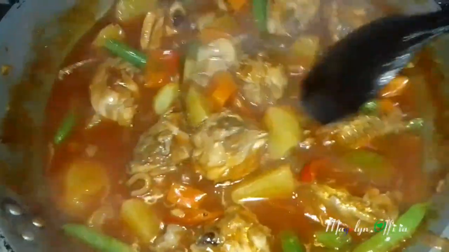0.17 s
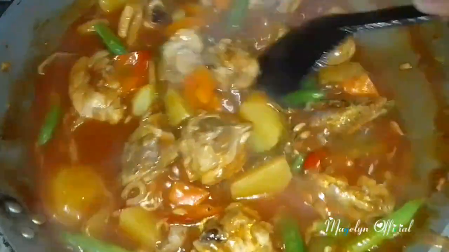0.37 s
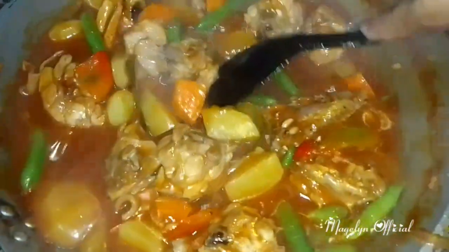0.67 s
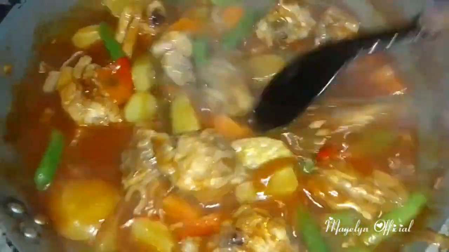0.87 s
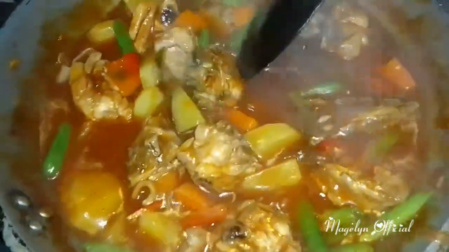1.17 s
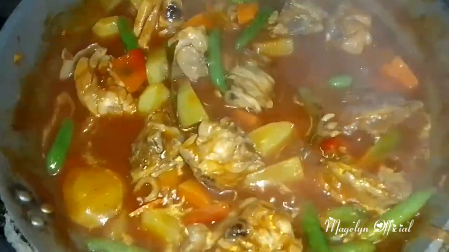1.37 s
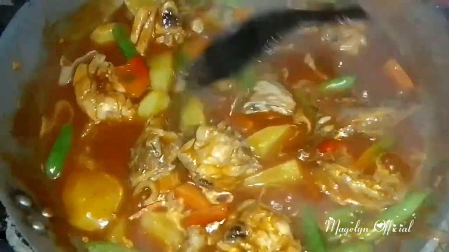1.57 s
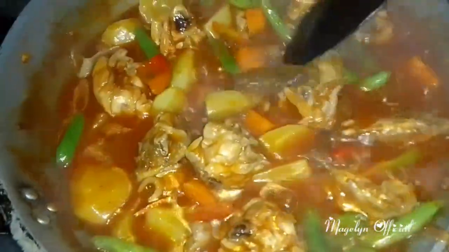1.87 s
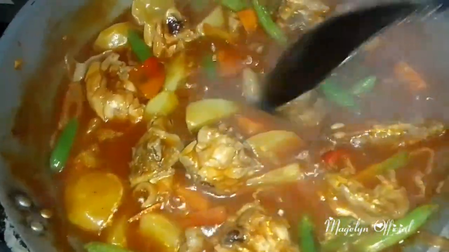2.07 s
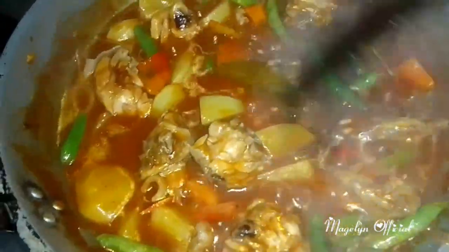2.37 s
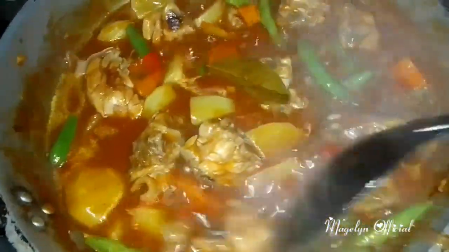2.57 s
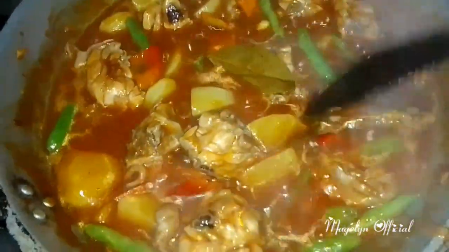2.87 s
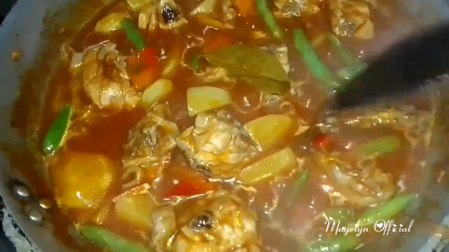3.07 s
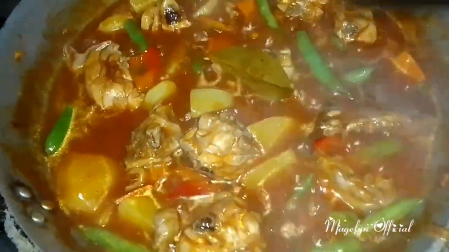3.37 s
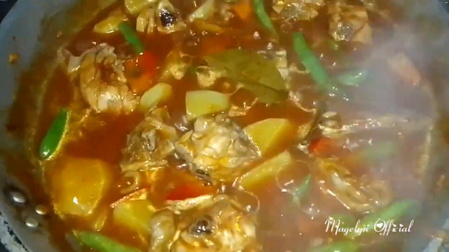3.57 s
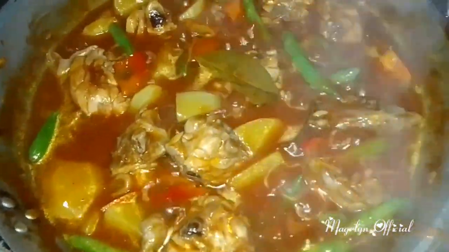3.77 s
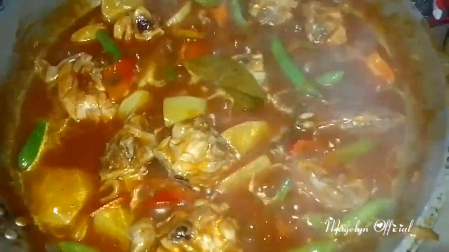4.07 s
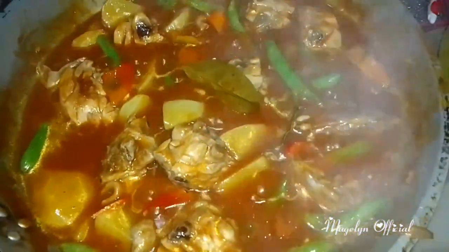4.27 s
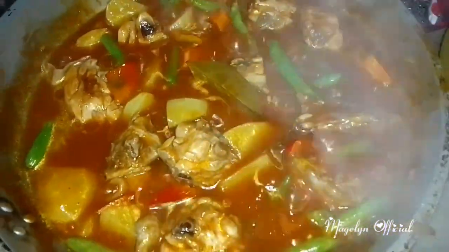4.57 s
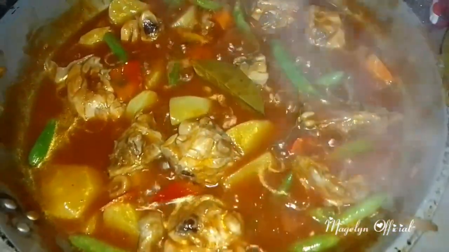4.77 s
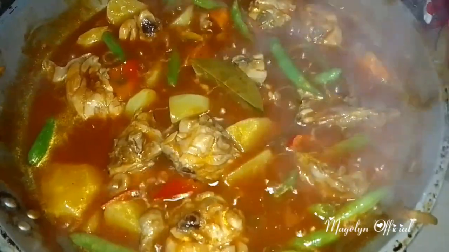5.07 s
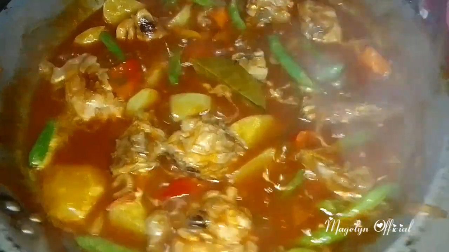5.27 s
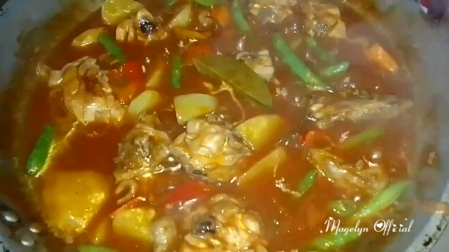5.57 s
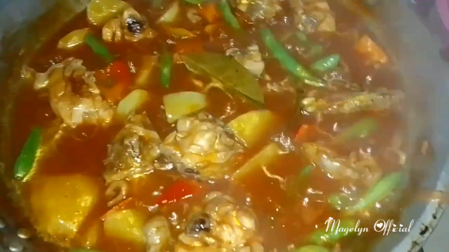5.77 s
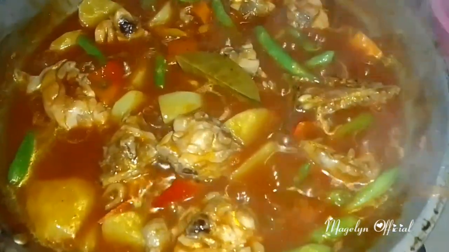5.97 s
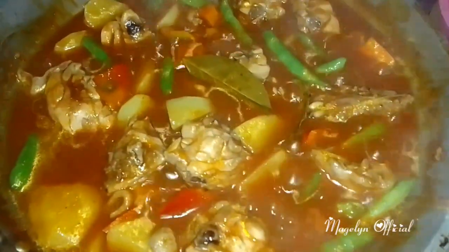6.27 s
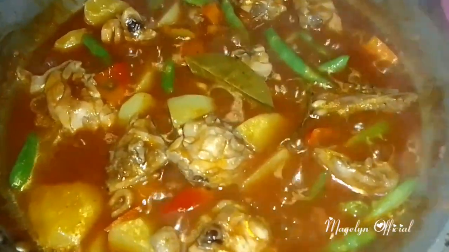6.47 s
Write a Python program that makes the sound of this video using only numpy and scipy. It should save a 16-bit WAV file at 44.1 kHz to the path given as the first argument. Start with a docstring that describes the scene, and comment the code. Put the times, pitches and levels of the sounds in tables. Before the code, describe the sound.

Close to a pan of thick stew in a small kitchen, bubbles blip, glug and plop over constant fine crackling. A plastic spoon bumps and scrapes busily in the first second, with one bright wet squelch, then returns for brief rasps and squeaks. A cluster of dull knocks comes around four and a half seconds, after which the boil grows fuller. A low wavering hum and soft room noise lie underneath.

```python
"""A thick stew simmers in a metal pan: bubbles plop and glug, and tiny ones crackle all the time.
Each bubble is a short ringing tone; films of sauce that burst add ticks and puffs of noise.
A plastic spoon pushes the pieces about, scraping, squeaking and bumping: random slips and knocks
ring the resonances of the pan and spoon. Behind it lie the low hum and steady noise of a kitchen,
made of filtered noise, and the short echo of a small room."""
import sys
import numpy as np
from scipy import signal
from scipy.fft import rfft, irfft
from scipy.io import wavfile

SR = 44100
rng = np.random.default_rng(int(sys.argv[2]) if len(sys.argv) > 2 else 0)


def wav_out(sig):
    """Save sig, one row per channel (or a flat mono array), as 16-bit PCM at SR to the path in sys.argv[1]."""
    wavfile.write(sys.argv[1], SR, np.round(np.clip(np.atleast_2d(sig).T, -1, 1) * 32767).astype(np.int16))


N = 292383

# how hard the stew boils: (time [s], level [dB])
BOIL_LEVEL = [(0, 6), (1.4, 3), (2.6, 5.5), (3.6, 6.5), (4.9, 6), (5.7, 8), (6.201, 7.5), (6.63, 8.5)]
# low resonances of the pan, damped by the stew: (pitch [Hz], width [Hz], level [dB])
PAN_MODES = [(173.4, 5.8, -4), (211, 39, -12), (265.7, 113, -4), (371.7, 85, -1.5), (441, 80, -3),
             (503.6, 67, 1), (615.6, 24, -3), (717, 68, -2.5), (775, 25, -10)]


def simmer():
    """Small bubbles blip, gurgle, splutter and pip in the sauce; the tiniest crackle, tick and spit at its edge."""
    # the crackle of tiny bubbles: (bursts per second [1/s], spread of strength [dB])
    crackle_bursts = (1100, 6.5)
    # colour of the crackle: (frequency [Hz], level [dB per Hz])
    crackle_colour = [(1800, 3.5), (3000, 4.5), (5000, 2.5), (8000, 0), (9300, -22), (15000, -42)]
    crackle_per_s, crackle_spread_db = crackle_bursts

    gurgle = swarm(388, 740, per_s=110, cycles=5.1, spread_db=6.5, rise=0.46, onset_cycles=0.59, count=12)
    blips = swarm(1143, 1500, per_s=99, cycles=6.6, spread_db=0.5, rise=0.072, onset_cycles=6.5, count=10)
    splutter = swarm(737, 1680, per_s=120, cycles=3.2, spread_db=2, rise=0.019, onset_cycles=0.39, count=14)
    pips = swarm(1690, 3520, per_s=70, cycles=17, spread_db=14.5, rise=0.074, onset_cycles=0.34, count=12)
    tiny = swarm(1750, 13500, crackle_per_s, cycles=4.2, spread_db=crackle_spread_db,
                 rise=0.017, onset_cycles=0.61)
    crackle = colour(tiny, crackle_colour)
    ticks = swarm(6970, 8760, per_s=66, cycles=36, spread_db=5, rise=0.024, onset_cycles=0.32, count=8)
    spray = spits(per_s=53, spread_db=3.5, fade_s=0.0057)

    bubbles = amp(-71.5) * gurgle + amp(-75.5) * blips + amp(-78.5) * splutter + amp(-86.5) * pips
    edge = amp(-85.0) * crackle + amp(-93.0) * ticks + amp(-87.0) * spray
    return amp(curve_db(BOIL_LEVEL)) * (bubbles + edge)


def spits(per_s, spread_db, fade_s):
    """Bursting films throw a fine spray: brief puffs of broad, gritty noise."""
    # colour of the spray: (frequency [Hz], level [dB per Hz])
    spray_colour = [(700, 16), (1500, 0), (3000, 8), (5000, 17), (8200, 3.5), (9500, -19), (15000, -36)]
    bursts = abs(clicks(N, per_s, spread_db))
    # every burst jumps up at once and then dies away
    puffs = signal.lfilter([1], [1, -np.exp(-1 / (fade_s * SR))], bursts)
    grit = clicks(N, per_s=3200, spread_db=-1.0)
    return colour(puffs * grit, spray_colour)


def glugs():
    """Deep bubbles heave under the pieces, far more as the boil grows."""
    boil = amp(1.33 * curve_db(BOIL_LEVEL))
    deep = swarm(144.3, 550, per_s=90, cycles=11.6, spread_db=4, rise=0.059, onset_cycles=0.67, count=10)
    return amp(-73.0) * boil * deep


def plops():
    """Each large bubble rings once, and its skin falls back in a short splutter."""
    # large bubbles burst: (time [s], peak level [dB], pitch [Hz], ring time [s])
    large_bubbles = [(0.074, -44.5, 1290, 0.058), (0.1186, -45.5, 1290, 0.032), (0.471, -37, 1290, 0.013),
                     (0.526, -35.5, 1450, 0.016), (0.553, -41, 1350, 0.016), (0.5995, -42, 1300, 0.023),
                     (0.644, -41.5, 1330, 0.028), (0.668, -53, 1380, 0.016), (0.7217, -38, 1375, 0.02),
                     (0.754, -51, 1370, 0.01), (0.766, -46, 1370, 0.025), (0.79, -46.5, 1370, 0.057),
                     (0.9972, -46, 1350, 0.0332), (1.3238, -49, 1290, 0.014), (1.3788, -50, 1302, 0.029),
                     (1.632, -41.5, 1430, 0.0057), (1.827, -38.5, 1187, 0.0092), (1.875, -46, 1190, 0.013),
                     (1.8955, -39.5, 1310, 0.013), (1.9776, -46, 1500, 0.0198), (2.37, -46.5, 1010, 0.011),
                     (2.432, -51.5, 1353, 0.022), (2.491, -53, 1450, 0.0089), (2.506, -50.5, 1390, 0.032),
                     (2.661, -43, 1223, 0.015), (2.936, -43.5, 1130, 0.015), (3.0788, -42.5, 1180, 0.018),
                     (3.7248, -41, 1270, 0.045), (3.745, -44.5, 1370, 0.029), (3.918, -43.5, 1420, 0.011),
                     (3.962, -50, 1800, 0.04), (4.191, -42.5, 1300, 0.013), (4.2085, -43, 1129, 0.025),
                     (4.321, -49, 1400, 0.057), (4.4957, -46.5, 1495, 0.029), (4.7416, -46, 1394, 0.025),
                     (4.883, -49, 1390, 0.0082), (4.939, -41.5, 537, 0.04), (4.973, -60, 1390, 0.015),
                     (5.026, -46.5, 1200, 0.016), (5.114, -54, 545, 0.019), (5.236, -48.5, 1445, 0.047),
                     (5.254, -45, 480, 0.04), (5.299, -44.5, 1850, 0.011), (5.424, -51, 1420, 0.015),
                     (5.494, -45.5, 463, 0.031), (5.59, -46.5, 1160, 0.0088), (5.675, -45.5, 1280, 0.0103),
                     (5.7752, -43.5, 1254, 0.053), (5.877, -49.5, 1090, 0.0164),
                     (6.025, -47.5, 1350, 0.015), (6.109, -45, 540, 0.028), (6.12, -41.5, 1332, 0.023),
                     (6.253, -45.5, 1400, 0.0095), (6.379, -50, 1903, 0.016), (6.573, -45, 1315, 0.041),
                     (6.6124, -37.5, 1070, 0.0045)]
    out = np.zeros(N)
    t = np.arange(SR // 10) / SR
    for start_s, db, hz, t60 in large_bubbles:
        add(out, start_s, amp(db) * bubble(hz, t60, rise=0.05, onset_cycles=2.5))
        # the splutter starts as the dome lifts, just before it bursts
        splutter = evened(band(clicks(len(t), 1000, 0.42), 924, 1440, order=2))
        envelope = np.exp(-t / 0.028) * (1 - np.exp(-t / 0.0073))
        add(out, start_s - .004, amp(db - 12.5) * splutter * envelope)
    return out


def squelch():
    """An air pocket squeezed out from under the spoon makes one bright blip that swells and dies."""
    # the blip: (peak level [dB], pitch [Hz], swell time [s], fade time [s])
    air_pocket = (-21, 1370, .003, .003)
    escape_s = .6276
    db, hz, swell_s, fade_s = air_pocket
    t = np.arange(N) / SR - escape_s
    envelope = np.exp(np.minimum(t / swell_s, -t / fade_s))
    return amp(db) * np.sin(2 * np.pi * hz * t) * envelope


def snaps():
    """A film of sauce snaps: a tick, a bright spit and a brief high ring."""
    # sharp wet snaps: (time [s], level [dB], pitch [Hz], brightness [dB])
    wet_snaps = [(0.559, -45.5, 6020, -57), (0.643, -36, 4490, -65), (0.795, -47.5, 3210, -68.5),
                 (0.8315, -48, 3113, -78), (0.889, -50.5, 3120, -88), (0.973, -51, 4827, -71),
                 (1.061, -51, 2730, -86), (1.1068, -51.5, 2850, -72), (1.567, -46, 3330, -71),
                 (1.925, -46, 4720, -88.5), (2.0393, -49.5, 6400, -71), (2.749, -50, 3770, -68.5),
                 (2.9056, -57, 2780, -63), (3.1794, -45.5, 2980, -67.5), (4.358, -47.5, 4400, -58),
                 (4.6628, -49, 4414, -72), (6.441, -58, 7560, -63)]
    out = np.zeros(N)
    t = np.arange(SR // 50) / SR
    for start_s, db, hz, bright_db in wet_snaps:
        noise = rng.standard_normal(len(t))
        tick = evened(band(noise, 2500, 6200, order=2)) * np.exp(-t / 0.0018)
        spit = evened(band(noise, 7900, SR / 2 - 1, order=2)) * np.exp(-t / 0.0009)
        high_ring = bubble(hz, 0.0158, rise=0.016, onset_cycles=1.1)
        add(out, start_s, amp(db - 19.5) * tick)
        add(out, start_s, amp(bright_db) * spit)
        add(out, start_s, amp(db - 5.5) * high_ring)
    return out


def shoves():
    """Shifted pieces jolt against the pan and the spoon judders over its floor; both stir the low modes."""
    # the spoon shoves pieces across the pan floor: (start [s], rise [s], hold [s], fade [s],
    # thump of the pieces [dB], push on the pan [dB], centre of the push [Hz])
    pushes = [(0.091, 0.006, 0.0067, 0.22, -49.5, -49, 470), (0.39, 0.026, 0.016, 0.08, -47.5, -42.5, 490),
              (0.472, 0.034, 0.44, 0.15, -55, -52, 650), (0.991, 0.13, 0.037, 0.2, -53, -51.5, 336),
              (1.579, 0.059, 0.0237, 0.33, -55.5, -62, 600), (1.857, 0.039, 0.0091, 0.144, -55, -63, 594),
              (1.937, 0.019, 0.065, 0.35, -57, -54, 684), (2.899, 0.064, 0.33, 0.12, -54, -54.5, 370),
              (3.978, 0.0099, 0.34, 0.23, -62, -83, 455), (4.189, 0.35, 0.061, 0.56, -54.5, -49, 564),
              (5.034, 0.04, 0.4, 0.35, -58, -55.5, 435)]
    push_q = 2.47  # sharpness of the push's colour
    out = np.zeros(N)
    for start_s, rise_s, hold_s, fade_s, thump_db, push_db, push_hz in pushes:
        move = effort(rise_s, hold_s, fade_s)
        jolts = clicks(len(move), per_s=600, spread_db=4.0)
        slips = clicks(len(move), per_s=550, spread_db=3.5)
        thump = band(ring(jolts, PAN_MODES, direct_db=-14.0), 134.0, 323.5)
        push = band(ring(focus(slips, push_hz, push_q), PAN_MODES, direct_db=-6.5), 252, 648)
        add(out, start_s, amp(thump_db) * played(thump, move))
        add(out, start_s, amp(push_db) * played(push, move))
    return out


def squishes():
    """The spoon ploughs through the sauce, which tears in a quick run of short wet clicks."""
    # runs of tearing sauce: (start [s], length [s], level [dB rms], lowest bubble [Hz], highest bubble [Hz])
    tearing_runs = [(.395, 0.078, -47.5, 724, 1960), (.475, .1, -56.5, 1230, 1850),
                    (0.597, 0.057, -50.5, 830, 2040), (0.742, 0.074, -62.5, 1206, 2250),
                    (1.885, 0.026, -54, 1030, 1650), (2.362, 0.078, -65.5, 880, 1960),
                    (2.73, .05, -59.5, 1580, 2900), (4.561, 0.0406, -52.5, 1380, 3120),
                    (5.081, 0.053, -57, 1070, 2500)]
    out = np.zeros(N)
    for start_s, length_s, db, lo_hz, hi_hz in tearing_runs:
        n = int(length_s * SR)
        tears = swarm(lo_hz, hi_hz, per_s=420, cycles=5, spread_db=2.0, rise=.1, onset_cycles=.5,
                      count=8, size=n)
        add(out, start_s, amp(db) * tears * signal.windows.tukey(n, .1))
    return out


def scrapes():
    """The spoon sticks and slips on the metal and slows in the sauce; slips rasp, fine grit scratches and hisses."""
    # the spoon lands and slides; each contact has its own low and high colour: (start [s], rise [s],
    # fade [s], rasp [dB], scratch [dB], fine hiss [dB], rasp centre [Hz], scratch centre [Hz])
    slides = [(0.0, 0.0017, 0.25, -71.5, -78.5, -76, 3280, 5270),
              (0.392, 0.0025, 0.18, -54, -71, -101, 1690, 5000),
              (0.434, 0.033, 0.4, -50.5, -72.5, -88.5, 1560, 5650),
              (.57, 0.13, 0.23, -60, -64.5, -73, 2000, 5160), (.78, 0.082, 0.19, -72, -71, -85, 2380, 4900),
              (1.103, 0.0061, 0.031, -54.5, -65.5, -85, 2700, 5870),
              (1.561, 0.0045, 0.059, -52.5, -71, -85, 2660, 3660),
              (1.883, 0.027, 0.22, -68, -69.5, -89, 1540, 6700),
              (2.023, 0.014, 0.071, -55, -64.5, -76.5, 1670, 6240),
              (2.728, 0.013, 0.099, -60.5, -67, -83, 2200, 7200),
              (2.839, 0.0094, 0.023, -78.5, -64.5, -87, 2780, 7440),
              (2.897, 0.011, 0.016, -57.5, -60, -84, 2740, 7540),
              (3.0, 0.28, 0.32, -77, -78, -88, 2780, 6600),
              (3.92, 0.021, 0.11, -56.5, -93, -86, 1780, 4400),
              (4.2, 0.048, 0.13, -56, -69, -92, 1420, 4060),
              (4.329, 0.019, 0.16, -62, -67, -73, 1880, 7900),
              (4.574, 0.0045, 0.068, -56, -83, -84, 2900, 3380),
              (5.064, 0.0031, 0.065, -63, -65, -105, 3570, 3670),
              (5.087, 0.0066, 0.092, -58.5, -76, -93, 1980, 4200),
              (5.3, 0.003, 0.059, -60, -68.5, -100, 1950, 4660)]
    # what the rubbed pan and spoon ring with: (pitch [Hz], width [Hz], level [dB])
    rubbed_modes = [(886, 120, 6), (1253, 94.5, 19.5), (1417, 184, 8), (1750, 100, 6), (2100, 200, -7),
                    (2340, 45, -9), (2440, 52, -8.5), (3025, 220, -3), (3370, 110, -5.5), (3840, 110, -6),
                    (4340, 120, -7.5), (4570, 100, -2.5), (4817, 84, -20), (5200, 180, -19),
                    (5604, 71, -18), (6130, 160, -5.5), (6400, 170, -13.5), (6840, 260, -15),
                    (7170, 73, -18.5), (7330, 210, -11.5), (7860, 160, -6), (8530, 190, -14),
                    (9310, 150, -15.5), (10500, 270, 1), (11150, 150, -2), (12000, 230, 5),
                    (12500, 180, -15), (12850, 240, 1), (13700, 270, 4), (13300, 190, 17), (15200, 190, 7),
                    (14800, 110, -6), (16200, 220, 5)]
    rasp_q, scratch_q = 7.2, 3.6  # sharpness of the two colours
    out = np.zeros(N)
    for start_s, rise_s, fade_s, rasp_db, scratch_db, hiss_db, low_hz, high_hz in slides:
        move = effort(rise_s, 0, fade_s)
        # the hand judders
        move = move * amp(drift(len(move), per_s=140, depth_db=3.5))
        slips = clicks(len(move), per_s=900, spread_db=5.0)
        grit = clicks(len(move), per_s=2400, spread_db=10.0)
        rasp = rub(focus(slips, low_hz, rasp_q), rubbed_modes, 760, 4600, direct_db=-21)
        scratch = rub(focus(grit, high_hz, scratch_q), rubbed_modes, 3300, 9200, direct_db=-15)
        hiss = rub(grit, rubbed_modes, 8800, 15000, direct_db=-5.5)
        for db, texture in (rasp_db, rasp), (scratch_db, scratch), (hiss_db, hiss):
            add(out, start_s, amp(db) * played(texture, move))
    return out


def rub(drive, modes, lo_hz, hi_hz, direct_db):
    """Rings the modes that lie in a band; each contact spot detunes them a little and favours some."""
    detune_share, favour_db = 0.0029, 5
    spot = rng.standard_normal((len(modes), 2))
    inside = []
    for (hz, width_hz, db), (pull, favour) in zip(modes, spot):
        if lo_hz < hz < hi_hz:
            inside.append((hz * (1 + detune_share * pull), width_hz, db + favour_db * favour))
    return band(ring(drive, inside, direct_db), lo_hz, hi_hz)


def squeaks():
    """Tiny slips keep a few resonances of the spoon singing in thin, finely fluttering lines."""
    # a gripping spoon sings; which resonances it holds depends on where it presses: (start [s],
    # length [s], glide [share of pitch], line width [Hz], lines as (pitch [Hz], level [dB]))
    songs = [(.43, .23, 0, 90, [(2330, -70), (2650, -72), (4370, -76), (4620, -76), (5980, -72),
             (7220, -80)]), (.6, .25, -.012, 80, [(1770, -67), (2260, -70), (2720, -75), (4260, -74),
             (4600, -74), (7230, -68), (8350, -78), (14640, -83)]), (.662, .11, 0, 70, [(3300, -66),
             (4900, -77), (5950, -79)]), (.76, .29, -.02, 80, [(1800, -72), (2700, -79), (3280, -76),
             (4330, -77), (4600, -73), (4930, -80), (5280, -83), (6880, -80)]),
             (.86, .42, 0, 40, [(4540, -88), (6000, -82)]), (1.36, .22, .17, 45, [(2070, -79), (2450, -82),
             (2840, -82), (3270, -87)]), (1.57, .27, -.025, 120, [(1800, -76), (2500, -77), (2830, -75),
             (3230, -76), (4660, -79), (6030, -84)]), (1.876, .37, -.005, 50, [(4720, -82), (6340, -89),
             (15100, -92)]), (2.745, .33, -.04, 170, [(2890, -76), (7480, -74), (8080, -74)]),
             (2.75, .62, 0, 110, [(12460, -95), (12990, -94), (13744, -94), (15332, -87)]),
             (2.92, .18, -.016, 50, [(1510, -66)]), (2.98, .5, 0, 70, [(2630, -78), (2930, -75),
             (3200, -84), (3960, -78), (5920, -86), (7280, -81)]), (4.22, .14, 0, 80, [(1790, -61),
             (2090, -68), (2530, -76), (4400, -76), (4750, -81)]), (4.31, .34, 0, 90, [(1800, -67),
             (2520, -80), (3180, -77), (4420, -77), (8280, -86)]), (4.54, .45, -.02, 80, [(1780, -80),
             (2540, -80), (3130, -79), (4480, -80), (14900, -92)]), (5.11, .2, 0, 18, [(1417, -71),
             (4183, -80)]), (5.29, .36, .01, 100, [(4086, -87), (4450, -83), (4760, -87)])]
    grip = .5  # how far the grip evens out the strength (0-1)
    out = np.zeros(N)
    for start_s, length_s, glide, width_hz, lines in songs:
        n = int(length_s * SR)
        # time, stretched so that the pitch glides
        bend = np.cumsum(1 + glide * np.linspace(-.5, .5, n)) / SR
        # it swells faster than it fades
        arch = np.sin(np.pi * np.linspace(0, 1, n, endpoint=False) ** .75) ** .7
        flutter = amp(drift(n, per_s=220, depth_db=4.0) + drift(n, per_s=45, depth_db=3.0))
        narrow = signal.butter(3, width_hz / 2, fs=SR, output="sos")
        for hz, db in lines:
            # move the line down to 0 Hz, filter it there, then move it back up
            turn = np.exp(2j * np.pi * hz * bend)
            slips = clicks(n, per_s=990, spread_db=1.0) / turn
            swing = signal.sosfilt(narrow, np.tile(slips, 2))[n:]  # already ringing as the grip sets in
            steadied = swing / (abs(swing) + 1e-9) ** grip
            tone = flutter * (turn * steadied).real
            add(out, start_s, amp(db) * played(tone, arch))
    return out


def bumps():
    """The spoon's edge knocks on the pan: a fading burst of noise rings low and middle modes."""
    # knocks: (time [s], tick [dB], thud [dB], clack [dB])
    knocks = [(0.117, -65, -52, -72), (0.3959, -63, -50, -57), (0.407, -63, -59, -70),
              (0.437, -64, -51, -57), (0.452, -60, -56, -53), (0.471, -65, -50.5, -61),
              (0.6, -60, -53, -55), (0.888, -62, -54.5, -72), (1.108, -62, -66, -76),
              (1.117, -57, -68, -65.5), (1.159, -66, -57, -72), (1.567, -58, -72, -75),
              (1.888, -68, -53, -62), (1.895, -61.5, -61, -62), (2.966, -69, -62, -63),
              (3.16, -62, -57, -62), (4.236, -80.5, -58, -57), (4.324, -67, -61, -61),
              (4.379, -61, -52, -66), (4.445, -67, -72, -86), (4.465, -56, -51, -76),
              (4.478, -48, -45.5, -84), (4.521, -59, -46, -80.5), (4.534, -64, -46.5, -81.5),
              (4.561, -56, -54, -52.5), (4.576, -54, -59, -53)]
    # middle resonances that a knock rings: (pitch [Hz], width [Hz], level [dB])
    clack_modes = [(1010, 130, -58.5), (1393, 100, 16.5), (1517, 37, 9), (1883, 61, 3.5), (2070, 800, -22),
                   (2490, 250, -10.5), (3060, 290, -25), (2960, 140, -27)]
    out = np.zeros(N)
    t = np.arange(SR // 16) / SR
    for start_s, tick_db, thud_db, clack_db in knocks:
        blow = rng.standard_normal(len(t)) * np.exp(-t / 0.0022)
        thud = evened(band(ring(blow, PAN_MODES, direct_db=-8.0), 80, 774))
        clack = evened(band(ring(blow, clack_modes, direct_db=-13.0), 1300, 2840))
        tick = band(blow, 700, 4300, order=1)
        add(out, start_s, amp(thud_db) * thud + amp(clack_db) * clack + amp(tick_db) * tick)
    return out


def walls(x, t60, wet_db):
    """The short echo of a small room: many random reflections that die away."""
    t = np.arange(SR // 2) / SR
    tail = clicks(len(t), 2000, 0.91) * np.exp(-np.log(1000) * t / t60) * (t > .003)
    echo = signal.oaconvolve(x, tail / np.linalg.norm(tail))[:N]
    return x + amp(wet_db) * echo


def kitchen():
    """A wavering low hum in the steady noise of the room and stove."""
    # colour of the room and stove noise: (frequency [Hz], level [dB per Hz])
    room_colour = [(15, -8.5), (28, -11.5), (42, -30), (65, -12), (95, -15), (150, -20.5), (280, -46.5),
                   (500, -31), (850, -44.5), (1350, -40.5), (2200, -52), (5400, -60.5), (8000, -66),
                   (9500, -71.5), (15000, -69.5)]
    # lines of the hum, the second before its swell: (pitch [Hz], width [Hz], level [dB rms])
    hum_lines = [(55.3, 8.6, -54), (114.24, 8.5, -58.5), (184.4, 6.2, -66.5)]
    # slow swell of the second line: (time [s], level [dB])
    hum_swell = [(0, 3.5), (1.3, -5), (2.1, 5.5), (2.7, -2.5), (3.05, 9.5), (3.35, 2), (3.8, 11.5),
                 (4.2, 3), (4.6, 5), (5.199, -2), (5.8, 5), (6.63, -4)]
    noise = amp(-52) * colour(rng.standard_normal(N), room_colour)
    first, second, third = (hum(*line) for line in hum_lines)
    return noise + first + amp(curve_db(hum_swell)) * second + third


def hum(centre_hz, width_hz, db):
    """One narrow, wavering line: noise kept only around one pitch."""
    hz = np.fft.rfftfreq(N, 1 / SR)
    spectrum = rfft(rng.standard_normal(N)) / (1 + ((hz - centre_hz) / width_hz) ** 2)
    return amp(db) * evened(irfft(spectrum, N))


def bubble(hz, t60, rise, onset_cycles):
    """The cavity of a burst bubble rings and rises in pitch as its hole widens; peak 1."""
    t = np.arange(int(max(t60, .002) * SR)) / SR
    # the pitch climbs during the first third of the ring
    pitch = hz * (1 + rise * (np.minimum(3 * t / t60, 1) - .5))
    turns = np.cumsum(pitch) / SR
    fade = np.exp(-np.log(1000) * t / t60)  # down by 60 dB after t60 seconds
    onset = 1 - np.exp(-turns / onset_cycles)
    wave = np.sin(2 * np.pi * turns) * fade * onset
    return wave / abs(wave).max()


def swarm(lo_hz, hi_hz, per_s, cycles, spread_db, rise, onset_cycles, count=24, size=N):
    """Bubbles of many sizes, each size bursting at its own random moments; rms 1."""
    out = np.zeros(size)
    for hz in np.geomspace(lo_hz, hi_hz, count):
        t60 = cycles * rng.uniform(1.0, 3.1) / hz
        grain = bubble(hz, t60, rise, onset_cycles)
        out += signal.oaconvolve(clicks(size, per_s / count, spread_db), grain)[:size]
    return evened(out)


def clicks(n, per_s, spread_db):
    """Random impulses of either sign and uneven strength."""
    chance = rng.random(n)
    size = np.minimum(rng.exponential(1, n), 4)
    sign = rng.choice([-1, 1], n)
    return (chance < per_s / SR) * sign * amp(spread_db * size)


def ring(x, modes, direct_db):
    """Drives steep resonances, each swelling and fading by chance, plus a little of the bare drive."""
    out = amp(direct_db) * x
    for hz, width_hz, db in modes:
        peak = signal.iirpeak(hz, hz / (1.63 * width_hz), SR)
        # filtering twice makes the resonance steep
        tone = signal.lfilter(*peak, signal.lfilter(*peak, x))
        out = out + amp(db + drift(len(x), per_s=14.93, depth_db=2.5)) * tone
    return out


def effort(rise_s, hold_s, fade_s):
    """One move of the hand: it builds up, holds, then falls by 20 dB in every fade time."""
    t = np.arange(int((rise_s + hold_s + 2 * fade_s) * SR)) / SR
    fade_times = np.maximum(t - rise_s - hold_s, 0) / fade_s
    return np.minimum(t / rise_s, 1) * amp(-20 * fade_times)


def played(x, move):
    """Lays a move's envelope on a texture, at rms 1 where the move is strongest."""
    return x * move * np.sqrt(np.sum(move ** 2) / np.sum((x * move) ** 2))


def drift(n, per_s, depth_db):
    """A slow random wander in dB, with per_s new target levels a second."""
    knots = rng.standard_normal(256)
    return depth_db * np.interp(np.arange(n) * per_s / SR, np.arange(len(knots)), knots)


def curve_db(points):
    """Joins (time, level) points into a level in dB for every sample."""
    return np.interp(np.arange(N) / SR, *np.transpose(points))


def colour(x, points):
    """Shapes x by a short list of spectrum points; rms 1."""
    hz, db = np.transpose(points)
    log_hz = np.log(np.fft.rfftfreq(len(x), 1 / SR) + 1)
    gain = amp(np.interp(log_hz, np.log(hz), db))
    return evened(irfft(rfft(x) * gain, len(x)))


def focus(x, hz, q):
    """Keeps one broad peak around hz; a higher q is sharper."""
    return signal.lfilter(*signal.iirpeak(hz, q, SR), x)


def band(x, lo_hz, hi_hz, order=3):
    """Keeps the sound between two frequencies."""
    return signal.sosfilt(signal.butter(order, [lo_hz, hi_hz], "band", fs=SR, output="sos"), x)


def amp(db):
    """Decibels to gain."""
    return 10 ** (np.asarray(db) / 20)


def evened(x):
    """Scales to rms 1."""
    return x / np.sqrt(np.mean(x ** 2) + 1e-20)


def add(mix, start_s, sound):
    """Mixes a sound in at a start time, cutting off what runs past the end."""
    part = mix[max(round(start_s * SR), 0):][:len(sound)]
    part += sound[:len(part)]


def scene():
    """The stew and the spoon echo in the room, over the kitchen's hum and noise."""
    stew = simmer() + glugs() + plops() + squelch() + snaps()
    spoon = shoves() + squishes() + scrapes() + squeaks() + bumps()
    return (walls(stew + spoon, t60=0.12, wet_db=-9.0) + kitchen())[None]


def record(dry):
    """The recorder's band limit and its small steady offset."""
    edge_hz, offset = 15550, .022
    low_pass = signal.firwin(511, edge_hz, window=("kaiser", 9), fs=SR)
    return signal.oaconvolve(dry, low_pass[None], "same") + offset


dry = scene()
out = record(dry)
wav_out(out)
```